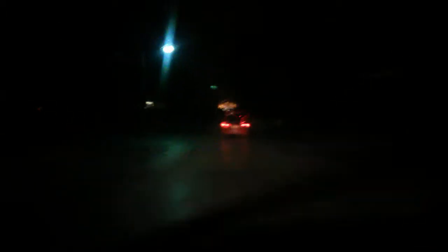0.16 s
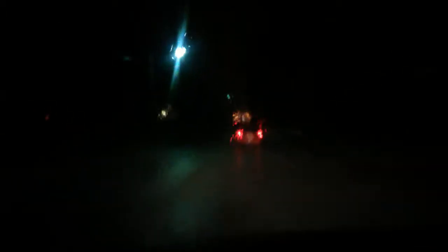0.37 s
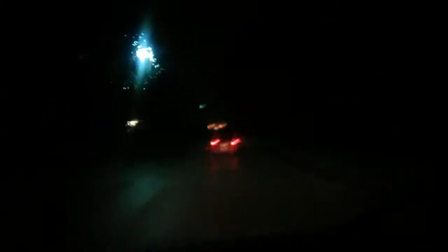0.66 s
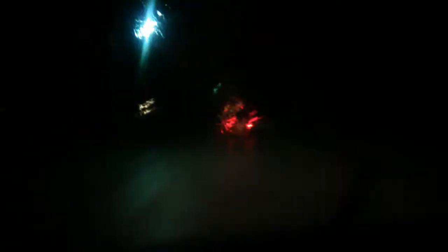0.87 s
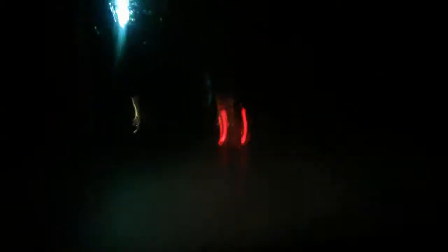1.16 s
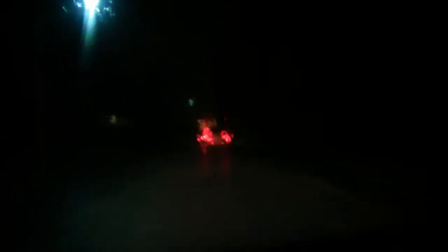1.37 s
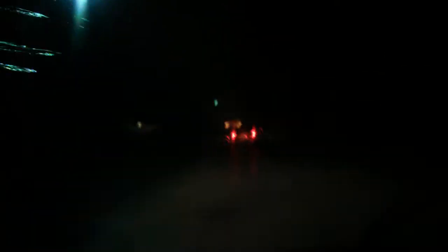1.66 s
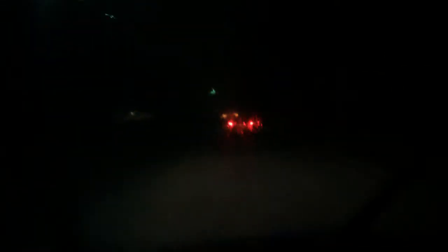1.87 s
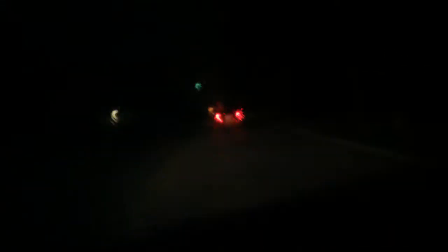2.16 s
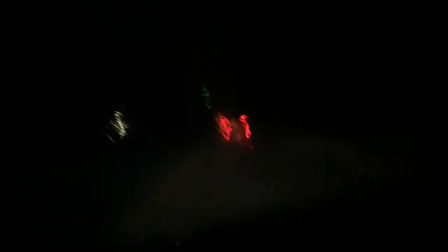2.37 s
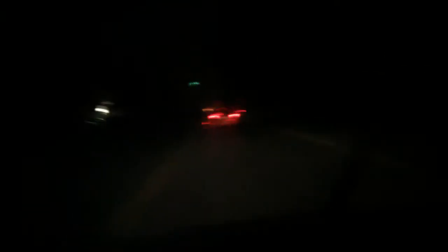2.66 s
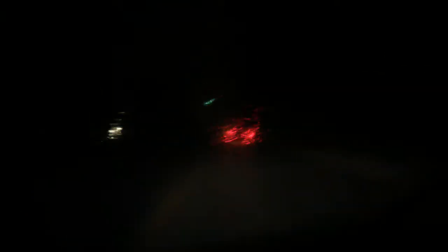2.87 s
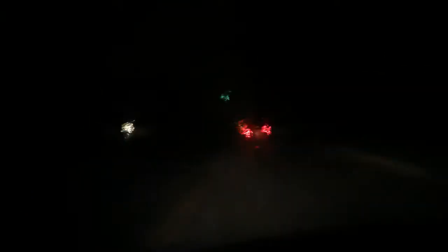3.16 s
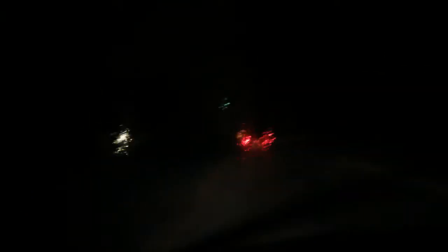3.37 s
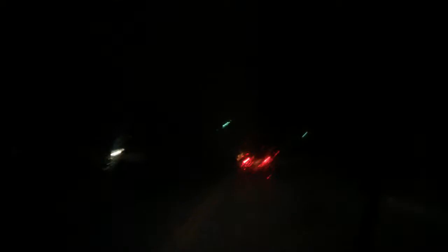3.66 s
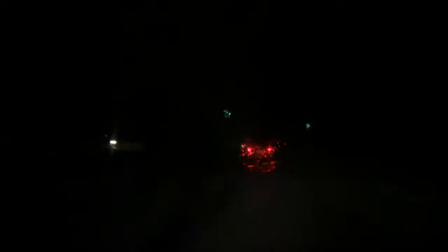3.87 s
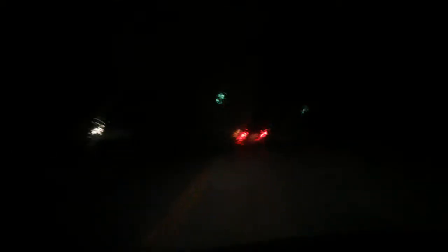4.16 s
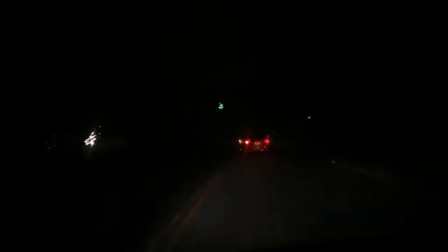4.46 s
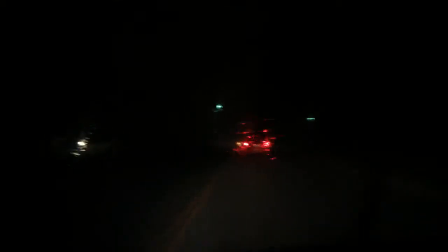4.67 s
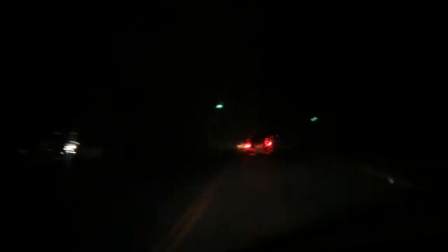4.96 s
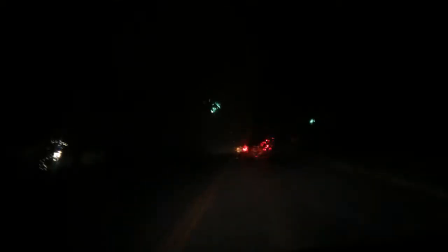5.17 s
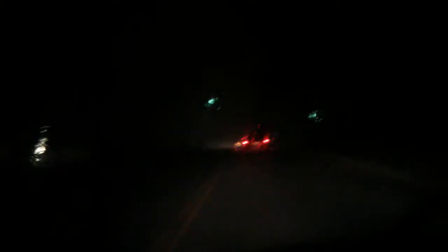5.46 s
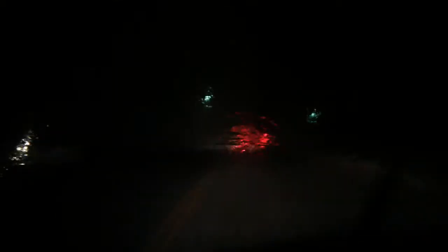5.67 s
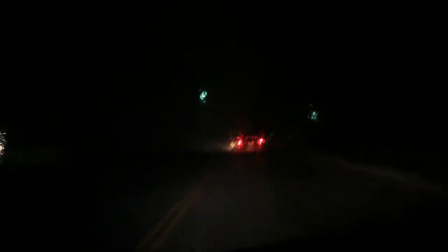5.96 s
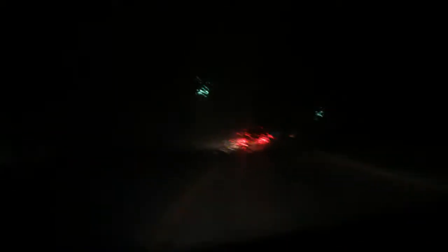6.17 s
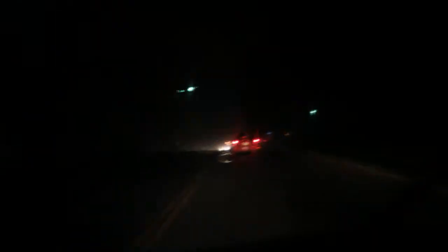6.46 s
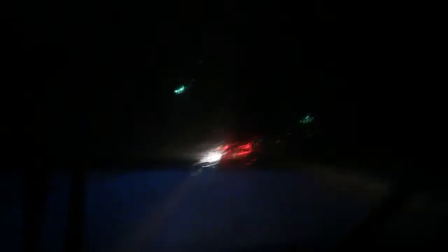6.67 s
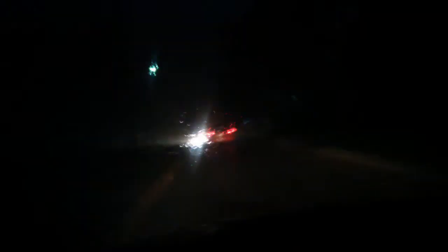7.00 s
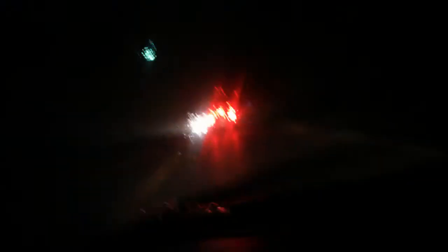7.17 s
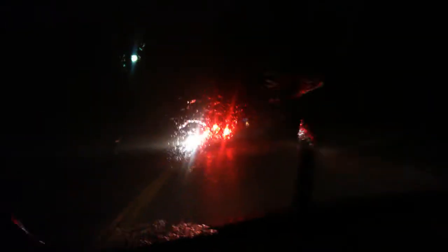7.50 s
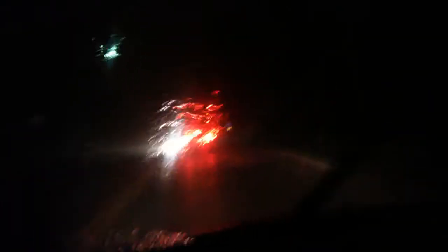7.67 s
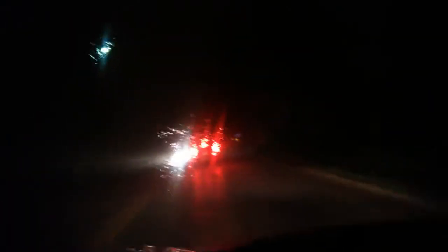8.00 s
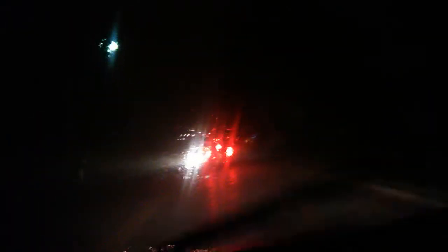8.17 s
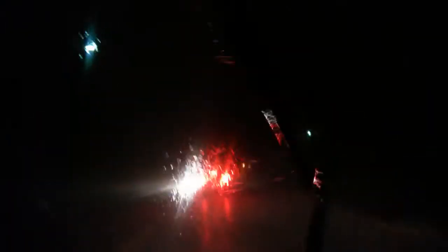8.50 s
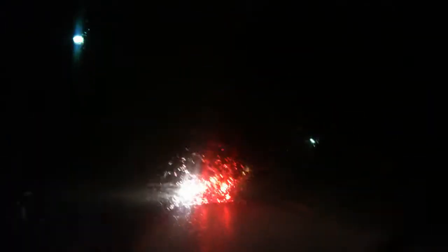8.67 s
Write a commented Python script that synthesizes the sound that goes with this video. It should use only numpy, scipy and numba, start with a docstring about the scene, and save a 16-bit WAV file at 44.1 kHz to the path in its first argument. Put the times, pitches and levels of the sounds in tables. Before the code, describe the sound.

Close cabin sound of a car driving through a downpour. Rain spatters brightly on glass and drums dully on the roof, surging and thinning in quick gusts, above low rumble and occasional bassy bumps. Late on comes an overloaded, boomy crash into water or a hole, with dense slaps under the floor. A quieter stretch follows, with low rumble, sparse ticks, hard trim or wiper clacks, and finally a burst of heavier drops.

```python
"""The cabin of a moving car in heavy rain. Over background rain that swells and thins, sheets of drops hit,
hold and drain away: random blows tick on the windscreen, ring the glass modes and drum on the roof, among
single fat drops. Filtered noise blows rumble as rough road below; damped pushes thud in the cabin's low modes;
trim clacks. The car hits a puddle or pothole with a loud thump and a wash of water under the floor, made of
dense slaps; the rain thins out, then returns."""
import sys
import numpy as np
from scipy import signal
from scipy.fft import rfft, irfft
from scipy.io import wavfile
from scipy.ndimage import uniform_filter1d
from numba import njit

SR = 44100
rng = np.random.default_rng(int(sys.argv[2]) if len(sys.argv) > 2 else 0)


def generate_wav(signal):
    """Clip the signal to [-1, 1] and save it as 16-bit WAV at the path in sys.argv[1]."""
    frames = np.transpose(np.atleast_2d(signal))
    scaled = np.clip(frames, -1, 1) * 32767
    pcm = np.round(scaled).astype(np.int16)
    wavfile.write(sys.argv[1], SR, pcm)


N = 389844

# Background rain between the sheets, swelling and thinning. Each row: time in seconds, then levels in dB
# before a small trim of fine spray, heavy drops on the glass and drumming on the roof.
BACKGROUND_RAIN = [(0.0, -25, -30, -30), (0.35, -28.5, -35, -32.5), (0.64, -32.5, -38.5, -40),
                   (0.86, -24, -23, -27.5), (1.85, -28.5, -27, -32.5), (2.5, -25, -22, -26),
                   (3.3, -24, -30, -32), (4.2, -26.5, -30.5, -31.5), (4.95, -25, -30.5, -33.5),
                   (5.65, -20.5, -22, -28.5), (6.21, -20.5, -29.5, -30.5), (6.4, -31, -34.5, -41.5),
                   (6.83, -40, -32.5, -34), (7.07, -55, -59, -52), (7.3, -49, -40, -46),
                   (7.65, -43, -48, -46.5), (8.21, -52.5, -48, -50.5), (8.65, -33, -33, -50)]
# Spectra of spray ticks, struck glass and roof panel. Each row: frequency in Hz, relative level in dB per Hz.
SPRAY_SPECTRUM = [(1000, -27), (2000, -37.5), (3500, -10.5), (5400, -10), (7200, -4), (8600, -9.5),
                  (10000, -3.5), (11100, 1), (12000, -2.5), (13200, -6.5), (16000, -15.5)]
GLASS_SPECTRUM = [(500, -28.5), (1000, -9.5), (1450, -8.5), (1750, -3), (2400, -2.5), (2900, -4),
                  (3300, -4), (4300, -5), (5400, -5.5), (8000, -12)]
PANEL_SPECTRUM = [(90, -22.5), (170, 4.5), (250, 3), (330, 6), (400, -6), (550, -6.5), (780, -0.5),
                  (1000, 1), (1400, -1), (2500, -11.5)]


def rain():
    """Random impact noise: thicker rain brings more drops and more level; all surfaces share one flutter."""
    spray_db = rainfall(curve(BACKGROUND_RAIN, axis=1), axis=2)
    glass_db = rainfall(curve(BACKGROUND_RAIN, axis=2), axis=3)
    roof_db = rainfall(curve(BACKGROUND_RAIN, axis=3), axis=4)
    thickness = undb(.45 * (spray_db + 23))  # multiplies the drop rates
    flutter_db = 0.72 * walk(35)

    ticks = shower(1200 * thickness, spread_db=7.5, t60=.003, tail_db=-12, tail_t60=.04, count=10)
    rings = shower(750 * thickness, spread_db=5.0, t60=0.0062, tail_db=3.5, tail_t60=0.075, count=8)
    notes = undb(-12.5) * patter(centre_hz=1902, octaves=.55, spread_db=2.5, t60=0.069)
    drums = shower(450 * thickness, spread_db=1, t60=0.022, tail_db=15, tail_t60=0.09, count=10)
    dents = undb(-13.5) * patter(centre_hz=624.3, octaves=0.514, spread_db=2.5, t60=0.084, count=600)

    spray = unit(colour(ticks, SPRAY_SPECTRUM))
    glass = unit(panes(colour(rings + notes, GLASS_SPECTRUM)))
    roof = unit(panes(colour(drums + dents, PANEL_SPECTRUM)))
    # the last term of each sum trims the balance
    spray_gain = undb(spray_db + flutter_db - 0.57)
    glass_gain = undb(glass_db + flutter_db + 1.04)
    roof_gain = undb(roof_db + flutter_db + 1.76)
    return spray * spray_gain + glass * glass_gain + roof * roof_gain


# Sheets of rain. Each row: start in seconds, length in seconds, then levels in dB before a small trim
# of fine spray, heavy drops on the glass and drumming on the roof.
RAIN_SHEETS = [(0.05, .27, -34, -27.5, -28.5), (0.678, .13, -20.5, -22, -30.5),
               (0.845, 0.088, -23.5, -24.5, -26.5), (1.049, 0.023, -28.5, -35, -42),
               (1.2, 0.26, -28.5, -22, -30), (1.569, 0.25, -27.5, -25, -50),
               (1.69, 0.082, -19.5, -23.5, -25.5), (1.9, .063, -20.5, -23, -29.5),
               (2.0, 0.07, -21.5, -22.5, -42), (2.228, 0.079, -22, -14.5, -21),
               (2.477, 0.067, -22.5, -21.5, -35), (2.595, 0.082, -23.5, -21.5, -26),
               (2.7, .27, -21, -16, -21), (2.8, 0.033, -24.5, -14, -15.5), (2.991, .19, -19, -17, -21.5),
               (3.37, 0.12, -18, -20.5, -29.5), (3.47, .13, -18, -18, -27), (3.68, 0.046, -14, -21, -40),
               (3.76, 0.037, -14.5, -19.5, -22.5), (3.845, 0.1, -21.5, -23, -27),
               (4.055, 0.044, -23.5, -24.5, -34), (4.278, .08, -19, -21.5, -35),
               (4.39, 0.076, -20.5, -23, -30.5), (4.495, 0.076, -21, -22.5, -31.5),
               (4.704, 0.12, -29, -25, -28.5), (5.034, .065, -23.5, -21.5, -53),
               (5.205, 0.12, -16.5, -15.5, -23), (5.357, 0.087, -20.5, -19, -34),
               (5.72, 0.23, -19.5, -21.5, -33), (5.95, 0.21, -23.5, -20.5, -26.5),
               (6.68, 0.062, -26.5, -30, -26), (7.105, 0.043, -30.5, -36, -53),
               (7.19, 0.067, -25.5, -38, -36.5), (7.35, 0.065, -33, -39, -50),
               (7.79, 0.096, -34.5, -31.5, -44), (7.92, 0.1, -33, -35.5, -48), (8.37, 0.029, -42, -42, -59),
               (8.45, .094, -38, -28.5, -58), (8.59, 0.084, -43, -36, -40), (8.68, 0.12, -35, -24.5, -51),
               (8.78, 0.068, -32, -20, -42)]


def rainfall(background_db, axis):
    """Incoherent addition: the power of the sheets adds to the background rain, giving one surface's dB."""
    # the rise share is the part of its length that a sheet adds to its attack
    sheets = swells(RAIN_SHEETS, attack_s=.025, t60=0.41, axis=axis, rise_share=0.11)
    return 10 * np.log10(undb(background_db) ** 2 + sheets)


# Bending modes of windscreen and roof. Each row: frequency in Hz, width in Hz, gain in dB over the plain hit.
BENDING_MODES = [(543, 60, 2), (788, 18, -1), (993, 21, -5), (1320, 53, -9), (1710, 54, -9.5),
                 (1832, 22, -10), (1980, 79, -19.5), (2325, 43, -9), (2860, 180, -9.5)]


def panes(x):
    """Modal resonance: glass and sheet metal ring on at their bending modes."""
    ringing = 0
    for hz, width, db in BENDING_MODES:
        ringing = ringing + undb(db) * band(x, np.full(N, float(hz)), float(width))
    return x + ringing


# Single big drops. Each row: start in seconds, relative tick level in dB, relative glass ring level in dB,
# pitch of the ring in Hz.
BIG_DROPS = [(0.091, -7, -10, 2200), (0.379, -9, -22, 2850), (0.4753, -9, -38, 2980),
             (0.5168, -9, -18.5, 3400), (0.7342, -6, -19, 2690), (0.932, -10, -2, 1770),
             (1.7876, -9, -14, 1770), (1.9285, -3, -16, 2340), (2.4413, -3, -19, 2400),
             (2.722, -3, -4, 2200), (3.4024, 0, -28, 2240), (3.4446, -10, -4, 1990),
             (3.4946, -16, -1, 1990), (3.7234, -7, -4, 2730), (4.039, -2, -36, 3960), (4.261, 0, -23, 2270),
             (4.2956, 0, -9, 3420), (4.513, -19, -7, 1760), (4.6246, -8, -15, 1700), (5.0802, 1, -7, 1860),
             (5.279, -7, -3, 1710), (6.8887, -15, -23, 1980), (6.9584, -10, -41, 1010),
             (7.1214, -15, -25, 2050), (7.2702, -11, -16, 3220), (7.592, -16.5, -63, 1040),
             (7.7937, -18, -25, 3500), (8.374, -28, -24.5, 2120), (8.643, -10, -23, 1830)]


def big_drops():
    """Impact excitation: fat drops crack on the windscreen and ring the glass."""
    ticks, rings = np.zeros(N), np.zeros(N)
    for s, tick_db, ring_db, hz in BIG_DROPS:
        tick = impact(t60=.01, tail_db=-14, tail_t60=.05)
        ring = impact(t60=.018, tail_db=-9, tail_t60=.06) + .3 * plink(hz, t60=.035)
        add(ticks, s, undb(tick_db + 17.5) * tick)
        add(rings, s, undb(ring_db + 23.5) * ring)
    return colour(ticks, SPRAY_SPECTRUM) + panes(colour(rings, GLASS_SPECTRUM))


# Hollow in the hiss, shifting as the microphone moves.
# Each row: time in seconds, centre in Hz, depth from 0 to 1.
MOVING_HOLLOW = [(0, 4430, 0.24), (.6, 4630, 0), (1.0, 5100, 0.68), (2.2, 5840, 0.63), (2.7, 5220, 0.84),
                 (3.5, 5940, 0.5), (5.0, 5640, 0.52), (6.3, 5600, 0.44), (7.5, 6060, 0.3),
                 (8.84, 6250, 0.64)]


def hollowed(x):
    """Interference: near the glass, direct and reflected hiss partly cancel in one band."""
    depth = np.clip(curve(MOVING_HOLLOW, axis=2), 0, 1)
    return x - depth * band(x, curve(MOVING_HOLLOW, axis=1), 4000.0)


# Low thuds and knocks in the cabin: road jolts, the big hit, a wiper thunk.
# Each row: start in seconds, peak level in dB, frequency of the push in Hz.
CABIN_THUDS = [(0.153, -12, 113), (0.924, -12, 128), (1.141, -21, 58), (1.25, -18, 56.5),
               (1.864, -12.5, 85), (1.884, -13, 199), (2.056, -11, 136), (2.184, -6, 84), (5.664, -15, 104),
               (6.56, -13, 228), (6.6006, -1.5, 294), (6.624, -0.5, 292), (6.643, -3.5, 87),
               (6.664, 0, 164), (6.692, -1.5, 126), (6.715, -6.5, 142), (6.736, -6, 92.5),
               (6.771, -10, 101), (6.849, -10.5, 130), (6.893, -19, 480), (6.968, -10, 110),
               (7.088, -16, 397), (7.118, -15, 97.5), (7.527, -13, 75.4), (7.628, -11, 92),
               (8.464, -16, 93), (8.65, -8.5, 140)]


def cabin_thuds(size=16384):
    """Forced response: each thud or knock is a short damped push that sets the cabin booming."""
    t = np.arange(size) / SR
    out, cabin = np.zeros(N), boom()
    for s, db, hz in CABIN_THUDS:
        push = np.sin(2 * np.pi * hz * t) * hz * t * np.exp(-hz * t / 0.44)
        thud = signal.fftconvolve(push, cabin)[:size]
        add(out, s, undb(db) * thud / np.abs(thud).max())
    return out


# Low modes of body and cabin air. Each row: frequency in Hz, relative level in dB, 60 dB decay time in seconds.
CABIN_MODES = [(52, -2, 0.27), (63, 2.5, 0.31), (90.3, 4, 0.22), (109.5, 10.5, 0.16), (142.5, 12.5, 0.17),
               (173, 1, 0.14), (236.3, 9, 0.17), (300, 9.5, 0.21), (344.5, 2, 0.49), (556, -10, .1)]


def boom(size=16384):
    """Impulse response by modal sum: the low modes of the body and cabin air, struck once."""
    t = np.arange(size) / SR
    return sum(undb(db) * fade(t, t60) * np.cos(2 * np.pi * hz * t) for hz, db, t60 in CABIN_MODES)


# Splashes under the floor, and soft low knocks after them, perhaps of the wipers.
# Each row: start in seconds, length in seconds, level in dB.
SPLASHES_AND_KNOCKS = [(6.598, 0.015, -8.5), (6.655, 0.021, -12.5), (6.885, 0.013, -31.5),
                       (7.0, 0.026, -34), (7.07, 0.035, -33), (7.89, 0.057, -35.5)]
# Spectrum of the splashes and soft knocks. Each row: frequency in Hz, relative level in dB per Hz.
WASH_SPECTRUM = [(100, -21.5), (300, 7.5), (420, -1.5), (580, -5.5), (800, -11.5), (1100, -10),
                 (1500, -20.5), (2500, -22), (4000, -27.5), (6000, -52)]


def splashes_and_knocks():
    """Dense random impacts: water batters the floor pan and drains away; soft low knocks share the noise."""
    slaps = shower(1500, spread_db=3, t60=.015, tail_db=-10, tail_t60=.06, count=4)
    power = swells(SPLASHES_AND_KNOCKS, attack_s=0.0024, t60=0.64)
    return unit(colour(slaps, WASH_SPECTRUM)) * np.sqrt(power)


# Hard clacks of wiper arms and trim. Each row: start in seconds, relative level in dB.
TRIM_CLACKS = [(6.601, -14), (6.612, -8.5), (6.619, -25), (7.769, -18.5), (8.224, -21), (8.318, -14),
               (8.322, -16.5), (8.467, -11)]


def clacks():
    """Solid impact: wiper arms and loose trim knock, hardest when the car hits the hole."""
    out = np.zeros(N)
    for s, db in TRIM_CLACKS:
        knock = impact(t60=.025, tail_db=-17, tail_t60=.12)
        add(out, s, undb(db + 22.5) * knock)
    # spectrum: Hz, relative dB per Hz
    return colour(out, [(500, -41), (1200, -7), (1900, 4.0), (3000, -5), (4500, -6.5), (6000, -21), (14000, -19)])


# Rough stretches of road. Each row: start in seconds, length in seconds, rumble level in dB.
ROUGH_STRETCHES = [(.1, .22, -29), (.82, 0.51, -25.5), (1.71, 0.2, -27), (1.84, 0.49, -24),
                   (2.3, 0.25, -25), (3.07, 0.1, -32), (3.45, 0.37, -31.5), (4.29, .48, -29),
                   (5.19, 0.11, -31.5), (5.63, 0.25, -22.5), (5.85, 0.52, -39), (6.595, .3, -19),
                   (6.95, 0.19, -21), (7.13, 0.27, -23.5), (7.4, 0.45, -26.5), (7.85, .28, -34.5),
                   (8.45, 0.54, -25)]
# Spectrum of the tyre rumble. Each row: frequency in Hz, relative level in dB per Hz.
RUMBLE_SPECTRUM = [(20, -24), (32, -26), (45, -2.5), (63, -12.5), (88, 2.5), (118, -3), (155, 1),
                   (200, -8.5), (310, -14), (400, -26.5), (800, -34), (2000, -46)]


def road():
    """Random excitation: tyres patter on tarmac, heard straight through and as boom in the cabin."""
    smooth_road_db = -36.5
    blows = shower(130, spread_db=4, t60=0.064, tail_db=-19.5, tail_t60=0.15, count=6)
    bumps = colour(blows, RUMBLE_SPECTRUM)
    booming = signal.oaconvolve(bumps, boom())[:N]
    rumble = unit(unit(bumps) + undb(-16.0) * unit(booming))
    power = undb(smooth_road_db) ** 2 + swells(ROUGH_STRETCHES, attack_s=0.0095, t60=0.5)
    return rumble * np.sqrt(power)


def shower(rate, spread_db, t60, tail_db, tail_t60, count=8):
    """Shot noise: blows of random size land at random (rate per second) on several spots with own rings."""
    lands = rng.random(N) < rate / SR
    sizes = undb(spread_db * np.clip(rng.standard_normal(N), -2, 2))
    pulses = lands * sizes / np.sqrt(rate)  # a denser shower keeps the same average power
    spot = rng.integers(count, size=N)
    out = np.zeros(N)
    for k in range(count):
        out += signal.oaconvolve(pulses * (spot == k), impact(t60, tail_db, tail_t60))[:N]
    return unit(out)


def patter(centre_hz, octaves, spread_db, t60, count=1400):
    """Modal excitation: each heavy drop wakes one note of a pane or panel, its pitch drawn at random."""
    out = np.zeros(N)
    starts = rng.random(count) * N / SR
    chances = np.clip(rng.standard_normal((count, 2)), -2, 2)
    for s, (pitch, size) in zip(starts, chances):
        note = plink(centre_hz * 2 ** (octaves * pitch), t60)
        add(out, s, undb(spread_db * size) * note)
    return unit(out)


def impact(t60, tail_db, tail_t60, size=4096):
    """Decaying noise burst of unit energy: a short crack and a tail of splatter and cabin echoes."""
    t = np.arange(size) / SR
    envelope = fade(t, t60) + undb(tail_db) * fade(t, tail_t60)
    hit = rng.standard_normal(size) * envelope
    return hit / np.sqrt(np.sum(hit ** 2))


def plink(hz, t60, size=4096):
    """Damped oscillation: a decaying sine of unit energy."""
    t = np.arange(size) / SR
    tone = np.sin(2 * np.pi * hz * t) * fade(t, t60)
    return tone / np.sqrt(np.sum(tone ** 2))


def swells(rows, attack_s, t60, axis=2, rise_share=0):
    """Power summation of events that rise, hold and die away; a rise share slows the rise of long ones."""
    t, power = np.arange(2 * SR) / SR, np.zeros(N)
    for row in rows:
        start_s, length_s = row[0], row[1]
        rise = np.minimum(t / (attack_s + rise_share * length_s), 1)
        decay = fade(np.maximum(t - length_s, 0), t60)
        add(power, start_s, (undb(row[axis]) * rise * decay) ** 2)
    return power


@njit
def band(x, hz, width):
    """State-variable resonance: a band-pass with a moving centre, gain one at the peak."""
    y, b, low = np.empty(len(x)), 0., 0.
    for i in range(len(x)):
        g, k = np.tan(np.pi * hz[i] / SR), width / hz[i]
        v = (b + g * (x[i] - low)) / (1 + g * (g + k))
        b, low, y[i] = 2 * v - b, low + 2 * g * v, k * v
    return y


def colour(x, points, size=4096):
    """Minimum-phase filtering: a causal filter with the given spectrum, built by folding its cepstrum."""
    hz, db = np.transpose(points)
    bins_hz = np.arange(size // 2 + 1) * SR / size
    log_gain = np.log(undb(np.interp(np.log(bins_hz + 1), np.log(hz), db)))
    cepstrum = irfft(log_gain)
    cepstrum[1:size // 2] *= 2
    cepstrum[size // 2 + 1:] = 0
    response = irfft(np.exp(rfft(cepstrum)))
    return signal.fftconvolve(x, response)[:len(x)]


def fade(t, t60):
    """Exponential decay: 60 dB down after t60 seconds."""
    return np.exp(-np.log(1000) * t / t60)


def walk(rate):
    """Low-pass randomness: smoothed chance steps, rate per second, with an rms of one."""
    k = int(SR / rate)
    steps = np.repeat(rng.standard_normal(N // k + 1), k)
    return unit(uniform_filter1d(steps, k)[:N])


def curve(rows, axis=1):
    """Linear interpolation: one column of a table, joined by straight lines in time."""
    rows = np.asarray(rows)
    return np.interp(np.arange(N) / SR, rows[:, 0], rows[:, axis])


def undb(db):
    """Logarithmic level: decibels to amplitude gain."""
    return 10 ** (np.asarray(db) / 20)


def unit(x):
    """Normalisation: scale to an rms of one."""
    return x / np.sqrt(np.mean(x ** 2))


def add(out, s, sound):
    """Superposition: mix a sound in at a time in seconds."""
    i = max(int(s * SR), 0)
    out[i:i + len(sound)] += sound[:max(N - i, 0)]


def scene():
    """Superposition of everything that reaches the microphone in the cabin."""
    water_on_panes = hollowed(rain() + big_drops())
    mix = water_on_panes + cabin_thuds() + splashes_and_knocks() + clacks() + road()
    return mix[None]


def record(dry):
    """Saturation and band limiting: the microphone rounds off the loudest peaks; the top is cut."""
    top_hz = 15800
    rounded = dry / (1 + dry ** 4) ** (1 / 4)
    low_pass = signal.ellip(10, .2, 80, top_hz, fs=SR, output="sos")
    return signal.sosfilt(low_pass, rounded)


dry = scene()
out = record(dry)
generate_wav(out)
```